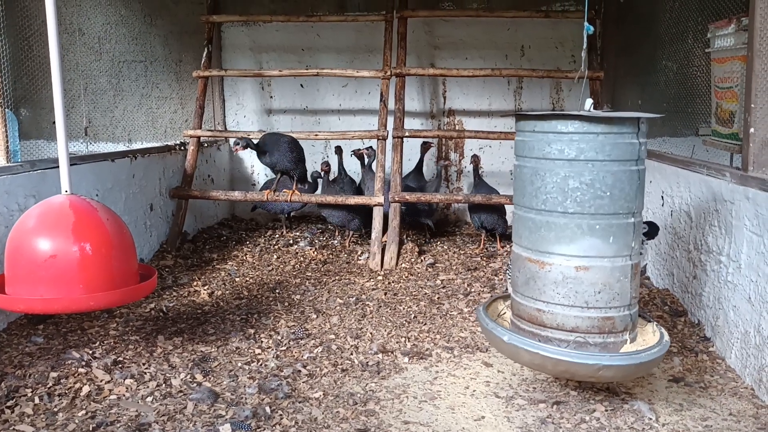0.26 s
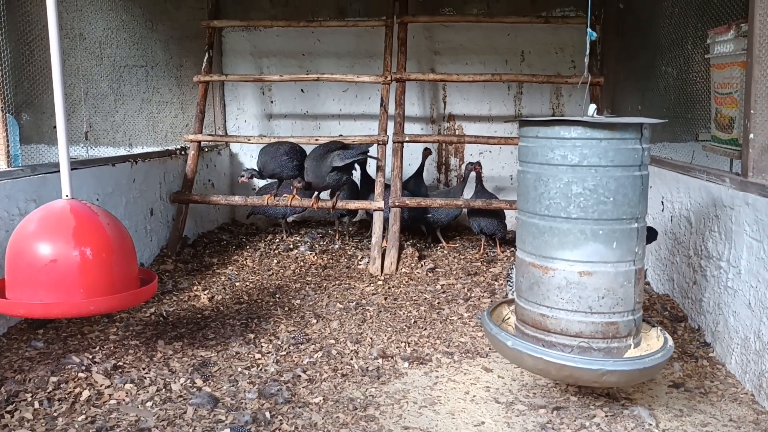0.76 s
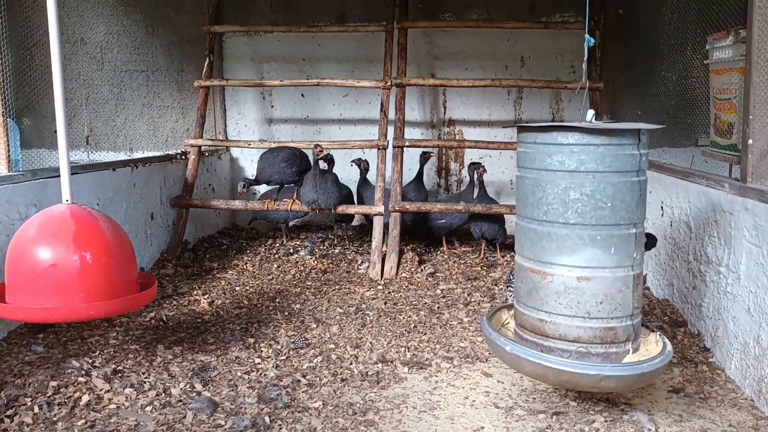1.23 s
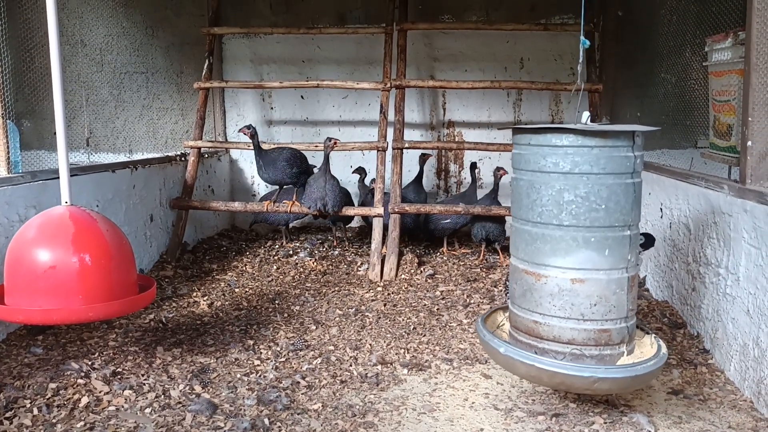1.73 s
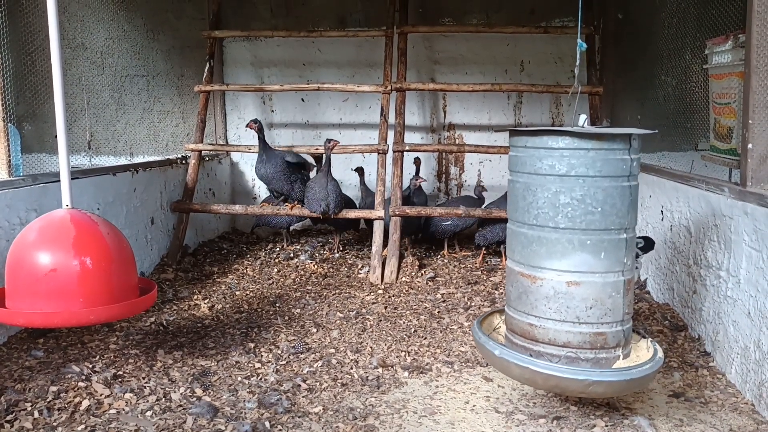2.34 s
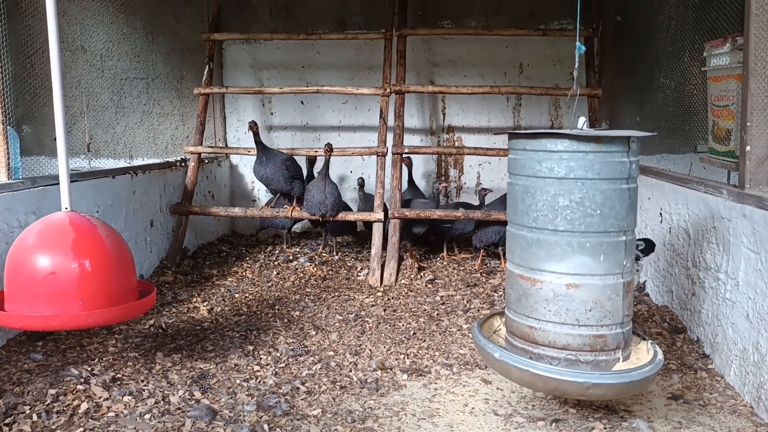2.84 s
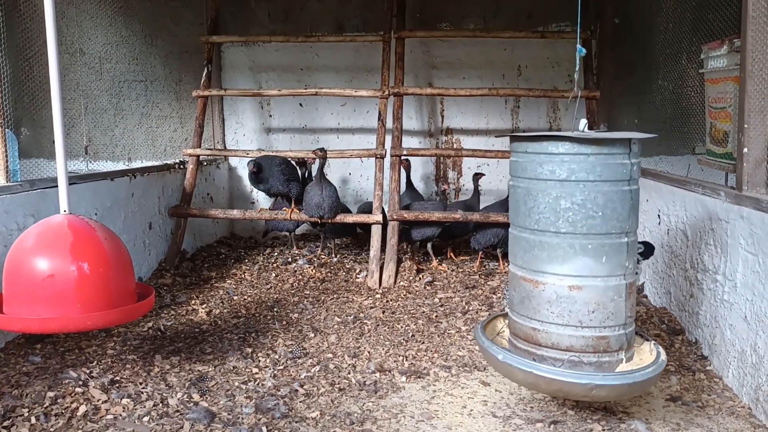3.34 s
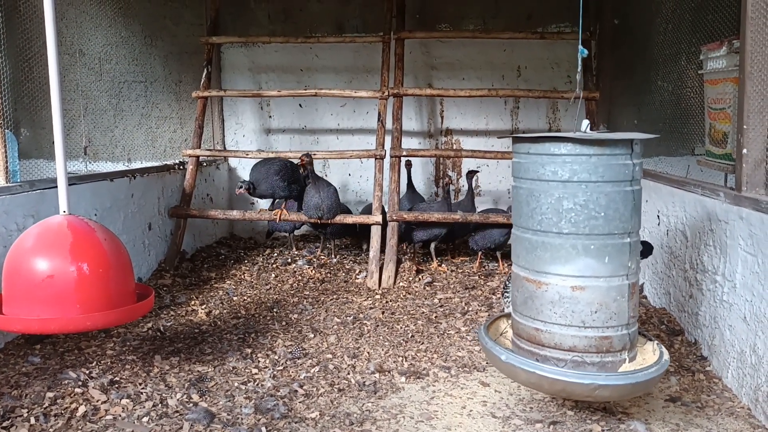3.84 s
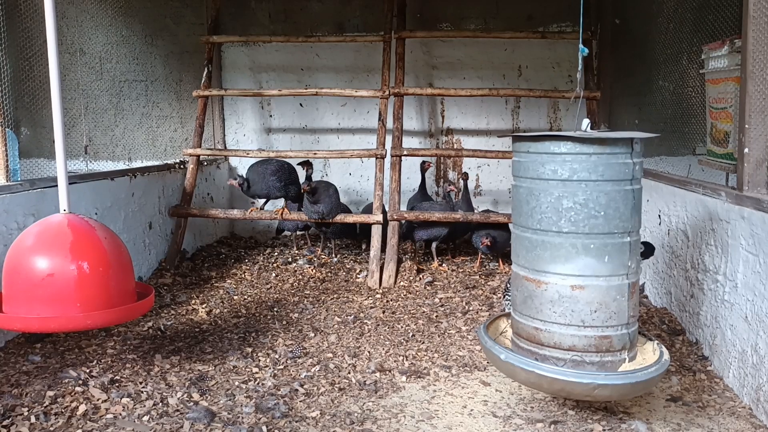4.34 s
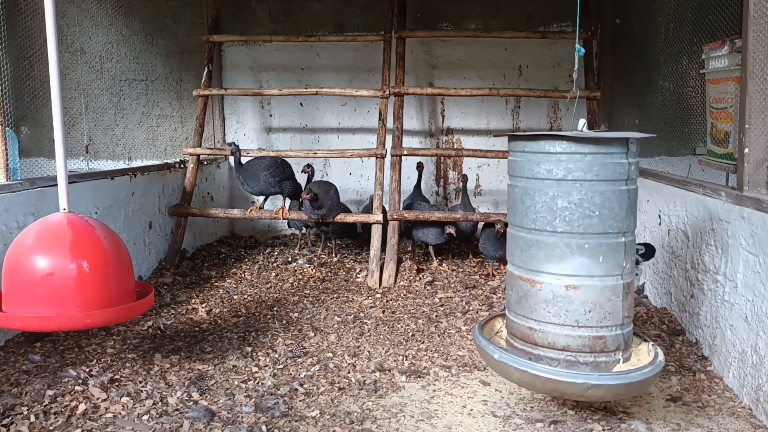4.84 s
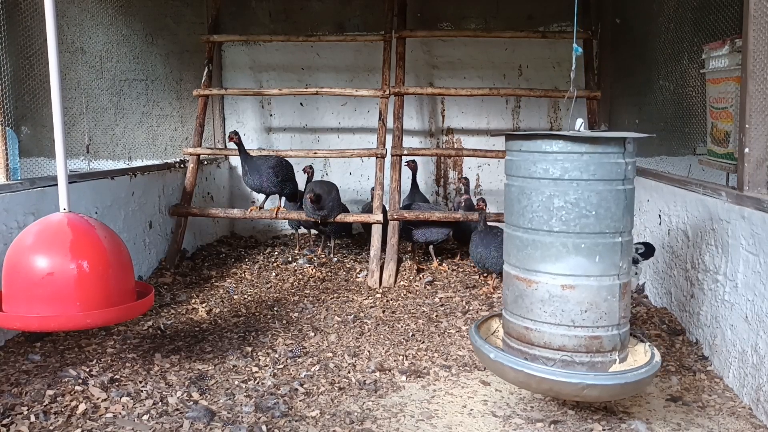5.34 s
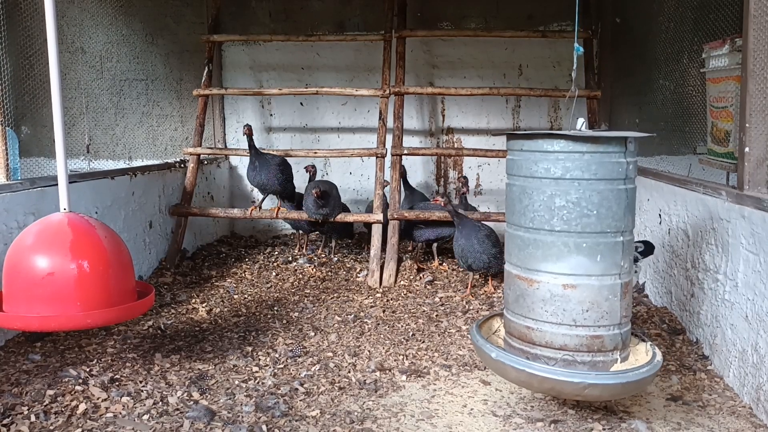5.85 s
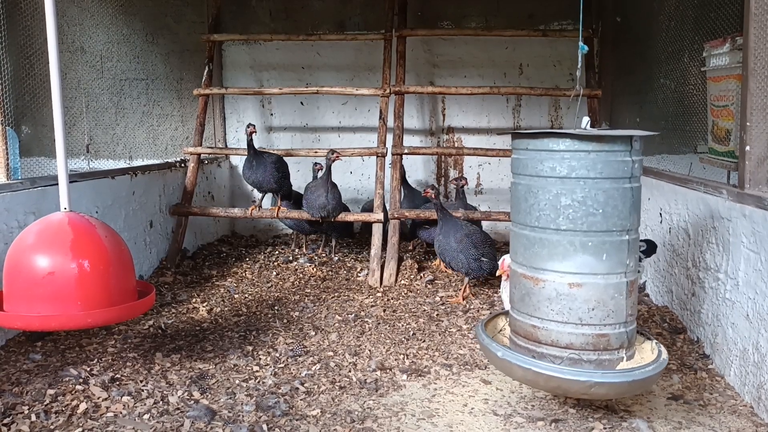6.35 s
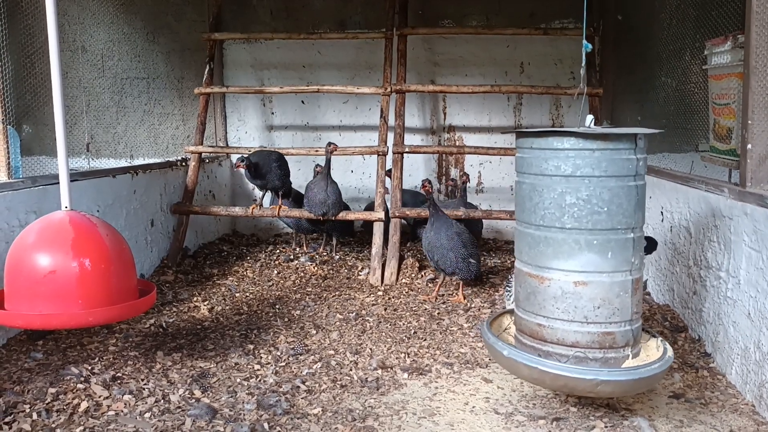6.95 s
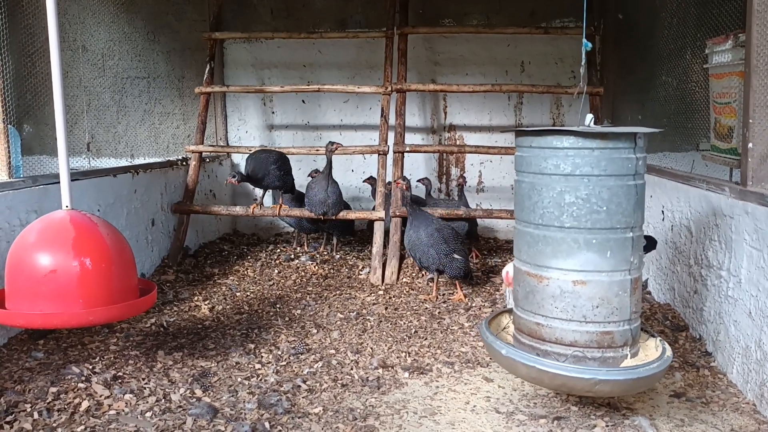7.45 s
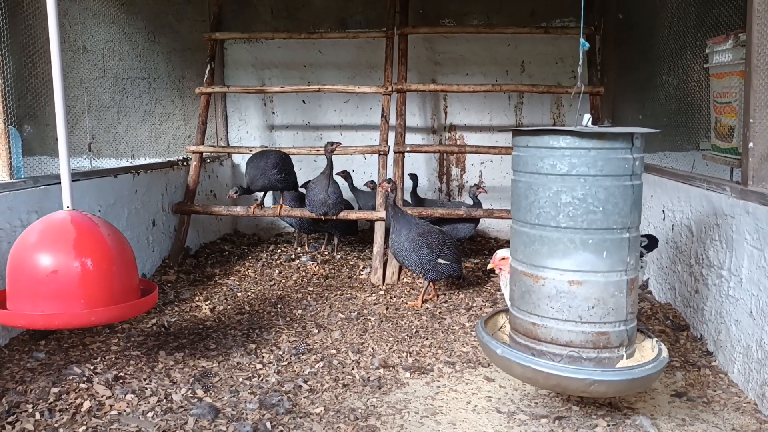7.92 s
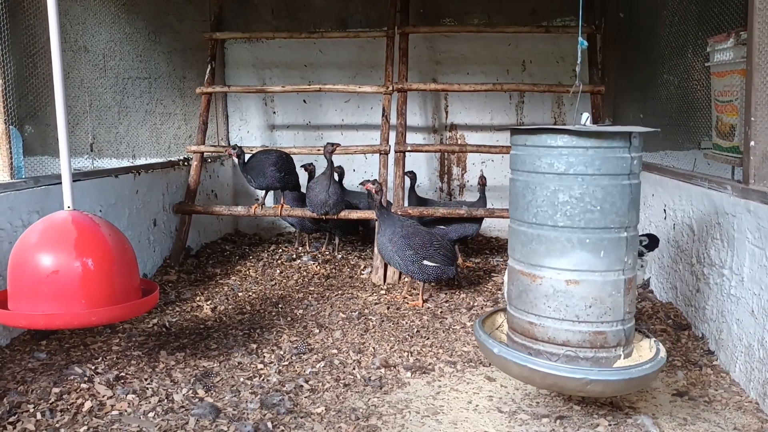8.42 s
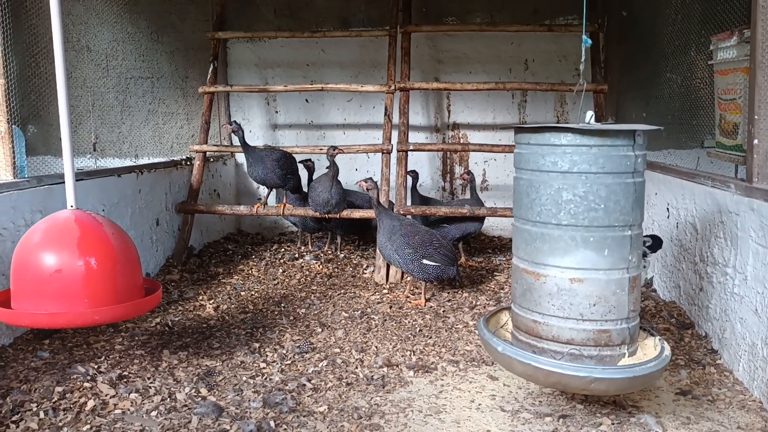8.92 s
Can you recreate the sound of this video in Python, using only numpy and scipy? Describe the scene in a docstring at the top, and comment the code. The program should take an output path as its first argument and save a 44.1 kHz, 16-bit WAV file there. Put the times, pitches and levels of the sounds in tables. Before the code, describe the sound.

A flock of guineafowl calls in harsh, fast, overlapping notes and squeals inside a walled pen, then calms to low clucks and thin peeps.

```python
"""A walled pen, a flock of guineafowl heard on two microphones, stronger on the left.
Harsh notes overlap, each a train of syrinx pulses through a throat resonance that falls as the beak
closes. Many open with, or break into, a clean squeal. At the end the flock calms to low clucks, thin
peeps from the back and one peck. The walls ring briefly; a faint hum wavers in soft background noise."""
import sys
import numpy as np
from scipy import signal
from scipy.fft import rfft, irfft, next_fast_len
from scipy.io import wavfile
from scipy.ndimage import uniform_filter1d, map_coordinates

SR = 44100
rng = np.random.default_rng(int(sys.argv[2]) if len(sys.argv) > 2 else 0)


def inscribe(sig):
    """Save sig as 16-bit PCM at rate SR to the path in sys.argv[1].

    A 1-D sig is mono; a 2-D sig holds one channel per row.
    Samples are clipped to [-1, 1] before scaling.
    """
    pcm = np.round(np.clip(np.atleast_2d(sig).T, -1, 1) * 32767)
    wavfile.write(sys.argv[1], SR, pcm.astype(np.int16))


N = 404838


def harsh_notes(bite_db=3, bite_s=.042, closing_db=14, chest_fade_db=4, rasp_rise_s=.0081):
    """Each note starts with a push of air; as the beak closes the throat falls and the rasp fades."""
    # start_s, length_s, pitch_hz, open_throat_hz, level_db
    notes = [(0, 0.075, 331, 1810, -21), (0.067, 0.059, 359, 2180, -20.5),
             (0.204, 0.16, 339.5, 1860, -18.5), (0.412, .14, 323.8, 2010, -20),
             (0.565, 0.058, 317, 2030, -26), (0.642, 0.081, 350, 2310, -27.5),
             (0.687, .11, 309.5, 2080, -25), (.88, 0.083, 324.6, 1970, -20),
             (1.072, 0.075, 328.5, 2300, -19), (1.198, .14, 353.6, 2360, -21.5),
             (1.391, 0.068, 318.3, 2270, -21.5), (1.574, 0.064, 327, 2380, -22),
             (1.701, 0.45, 316.9, 2024, -20), (2.043, 0.26, 320.4, 2100, -26), (2.173, 0.2, 310, 1690, -21),
             (2.292, 0.078, 316.4, 3050, -27.5), (2.402, 0.052, 316, 2250, -21),
             (2.577, 0.14, 332.4, 2360, -20.5), (2.771, .11, 334.8, 2400, -22),
             (2.888, 0.068, 328, 2610, -24.5), (3.006, .065, 355, 2420, -23),
             (3.078, 0.098, 312.2, 1620, -21.5), (3.173, 0.063, 317.4, 1760, -20.5),
             (3.257, 0.096, 330, 2160, -21.5), (3.365, 0.15, 317.7, 1700, -21.5),
             (3.563, .15, 345.3, 2150, -19.5), (3.846, 0.16, 344.2, 2150, -21),
             (4.178, .16, 350.8, 1930, -20.5), (4.413, 0.064, 362.5, 2200, -22.5),
             (4.559, .12, 350.2, 1920, -19.5), (4.711, 0.054, 363.6, 2270, -19),
             (4.864, .15, 333, 2000, -20), (5.105, 0.059, 330.3, 2350, -20.5),
             (5.264, .08, 324.1, 2170, -19.5), (5.373, 0.22, 337.3, 2380, -22),
             (5.514, 0.31, 312.5, 2210, -23.5), (5.731, 0.097, 317.7, 1810, -20),
             (5.838, 0.087, 311.4, 2000, -20.5), (6.089, .12, 356, 2510, -22),
             (6.306, .1, 341.5, 2580, -21.5), (6.409, 0.16, 321.3, 1350, -25.5),
             (6.511, 0.096, 344, 2230, -20), (6.648, 0.076, 351, 2980, -25),
             (6.752, 0.13, 339.4, 2150, -19.5), (6.962, 0.096, 329.6, 2430, -15.5),
             (7.185, .11, 316.9, 2080, -19.5), (7.352, 0.054, 326, 2070, -17.5),
             (7.575, 0.053, 332.2, 2460, -16.5), (7.8, 0.051, 322.7, 2110, -19.5),
             (8.109, 0.049, 311.4, 2520, -22)]
    usual_pitch_hz, usual_throat_hz, usual_length_s = 332, 2150, .1
    gape, gape_s = .16, .0084  # the beak flies open: the throat starts this share higher, then settles
    out = np.zeros((2, N))
    for start_s, length_s, pitch_hz, open_hz, level_db in notes:
        t, envelope = gate(length_s, attack_s=.00085, release_s=.0025)
        closing = np.minimum(t / length_s, 1)
        pulses, low_harmonics = voice(t, length_s, pitch_hz)
        strain_hz = pitch_hz - usual_pitch_hz
        closed_hz = 1504 + 1.8 * strain_hz
        centre_hz = open_hz * (closed_hz / open_hz) ** closing * (1 + gape * np.exp(-t / gape_s))
        open_cry = throat(pulses, centre_hz, width_hz=780, cut_hz=894)
        closed_cry = throat(pulses, centre_hz, width_hz=780, cut_hz=813)
        cry = unit((1 - closing) * open_cry + closing * closed_cry)
        # a wider beak and a higher, strained pitch give more rasp
        rasp_db = -.5 + 11 * np.log2(open_hz / usual_throat_hz) + .06 * strain_hz
        rasp_gain = amp(rasp_db - closing_db * closing ** 2) * np.minimum(t / rasp_rise_s, 1)
        edge = rasp_gain * rasp(pulses, start_s)
        # the lowest harmonics leak out through the neck, most in short, strained barks
        chest_db = -21.5 + 2.2 * np.log2(usual_length_s / length_s) + .06 * strain_hz
        chest = amp(chest_db + chest_fade_db * (.93 - closing)) * low_harmonics
        push = amp(level_db + bite_db * np.exp(-t / bite_s))
        add(out, start_s, pen(envelope * push * (cry + edge + chest)))
    return out


def voice(t, length_s, pitch_hz, sag=.25, settle_s=.035, opening_ratio=1.53, break_s=.016):
    """A high, clear opening breaks into a lower, sagging buzz: gives pulses and two low harmonics."""
    strain = np.exp(-t / settle_s)
    bend = 1 + sag * (strain - strain[t < length_s].mean()) + .01 * wobble(len(t), 70)
    cycles = np.cumsum(pitch_hz * bend) / SR
    opening_hz = opening_ratio * pitch_hz * (1 + .015 * rng.standard_normal())
    clear = syrinx(opening_hz * t, jitter=.015)
    buzz = syrinx(cycles, jitter=np.interp(length_s, [.06, .25], [.032, .024]))  # held notes settle
    broken = 1 / (1 + (break_s / (t + 1 / SR)) ** 6)
    pulses = np.sqrt(1 - broken) * clear + np.sqrt(broken) * buzz
    low_harmonics = np.sin(2 * np.pi * cycles) + amp(-12) * np.sin(4 * np.pi * cycles)
    return pulses, np.sqrt(broken) * low_harmonics * amp(3 * wobble(len(t), 90))


def syrinx(cycles, jitter, shimmer_db=2.2):
    """One slightly uneven pulse a cycle, with a little air chopped at the same rate."""
    size, count = len(cycles), int(cycles[-1]) + 1
    onsets = np.interp(np.arange(count) + jitter * rng.standard_normal(count), cycles, np.arange(size))
    pulses = np.bincount(onsets.astype(int), amp(shimmer_db * rng.standard_normal(count)), size)
    breath = rng.standard_normal(size) * (1 + np.cos(2 * np.pi * cycles))
    return unit(unit(pulses) + .2 * unit(breath))


def throat(x, centre_hz, width_hz, cut_hz):
    """A gliding resonance, applied twice; the short windpipe radiates little below cut_hz."""
    carrier = np.exp(2j * np.pi * np.cumsum(centre_hz) / SR)
    pole = np.exp(-np.pi * width_hz / SR)
    ring = (signal.lfilter([1], np.poly([pole, pole]), x / carrier) * carrier).real
    return unit(signal.sosfilt(signal.butter(6, cut_hz, "high", fs=SR, output="sos"), ring))


def rasp(pulses, start_s, smear_rad=2.04, ripple_db=2.5):
    """Each pulse rattles briefly in the windpipe, which spreads it in time and colours the note."""
    # spectrum of the rasp: frequency_hz, density_db
    spectrum = [(200, -51), (480, -28), (600, -7.5), (780, -38.5), (950, -4.5), (1400, 5), (2000, 3),
                (2800, 1.5), (4200, 0.5), (5000, -9.5), (5800, -16), (7000, -13), (9500, -13.5),
                (11500, -21.5), (15500, -27)]
    # lift of its top octave through the scene: time_s, gain_db
    top_octave = [(0, -2.5), (1.5, 4), (3.2, 0.5), (4.6, 3.5), (5.9, -4.5), (7.1, 4.5), (7.8, -3.5)]

    def windpipe(hz):
        phase, ripple = (map_coordinates(knots, [hz / 500]) for knots in rng.standard_normal((2, 50)))
        top_db = np.interp(start_s, *np.transpose(top_octave)) * np.clip((hz - 7000) / 6000, 0, 1)
        return amp(along(spectrum, hz) + top_db + ripple_db * ripple) * np.exp(1j * smear_rad * phase)
    return unit(filtered(pulses, windpipe))


def squeals(boost_db=2, first_db_per_s=190, fall=.054, dull_hz=3700):
    """The syrinx jumps to a high, clean mode, and the throat favours its second harmonic."""
    # start_s, length_s, pitch_hz, level_db
    notes = [(0.414, .021, 1310, -24), (0.886, 0.0068, 1230, -11), (1.048, 0.022, 1515, -21.5),
             (1.066, 0.053, 1079, -15), (1.193, .047, 1366, -25), (1.391, 0.019, 1526, -23.5),
             (1.579, 0.011, 1215, -16), (1.7, 0.061, 1353, -24), (2.032, .027, 1210, -16),
             (2.31, .028, 1196, -21), (3.188, 0.034, 964, -15), (3.562, 0.02, 1305, -18.5),
             (3.965, 0.078, 1079, -15), (4.19, 0.042, 958, -16), (4.414, 0.025, 1114, -21.5),
             (4.565, 0.025, 1076, -20), (4.865, 0.015, 1312, -17.5), (5.105, 0.018, 1318, -19.5),
             (5.459, 0.052, 1020, -24), (7.015, 0.044, 1112, -12), (7.191, .015, 1514, -22.5),
             (7.798, 0.016, 1510, -24.5)]
    out = np.zeros((2, N))
    for start_s, length_s, pitch_hz, level_db in notes:
        t, envelope = gate(length_s, attack_s=.003, release_s=.003)
        bend = 1 + fall * (.5 - t / length_s) + .022 * wobble(len(t), 290)
        phase = 2 * np.pi * np.cumsum(pitch_hz * bend) / SR
        first = amp(-17 + first_db_per_s * np.minimum(t, length_s))  # grows as the beak closes
        third = amp(-9) / (1 + (3 * pitch_hz / dull_hz) ** 6)
        tone = sum(gain * np.sin(k * phase) for k, gain in enumerate([first, 1, third, amp(-27)], 1))
        squeal = amp(boost_db + level_db) * np.sqrt(2) * envelope * tone
        add(out, start_s, pen(squeal, direct_db=-4, walls_db=-6.5, tail_db=-19))
    return out


def clucks(open_hz=1030, shut_hz=830, chest_db=-24, rasp_db=-5, closing_db=14):
    """Soft, low clucks and grunts that swell quickly and fade gently, with the beak nearly shut."""
    # start_s, length_s, pitch_hz, level_db
    notes = [(3.829, 0.025, 360.6, -28), (4.151, 0.029, 389, -37), (7.552, .023, 503, -28),
             (7.762, 0.02, 440, -30.5), (8.041, 0.094, 393, -33.5), (8.181, 0.053, 318, -26),
             (8.322, 0.067, 297, -26), (8.415, 0.083, 307, -22.5), (8.565, 0.064, 288.4, -25),
             (8.738, 0.058, 284.3, -25.5), (8.928, 0.06, 388, -28.5)]
    out = np.zeros((2, N))
    for start_s, length_s, pitch_hz, level_db in notes:
        t = np.arange(int(length_s * SR)) / SR
        closing = t / length_s
        pulses = syrinx(pitch_hz * t, jitter=.06)
        cry = throat(pulses, open_hz * (shut_hz / open_hz) ** closing, width_hz=850, cut_hz=784)
        chest = amp(chest_db) * np.sin(2 * np.pi * pitch_hz * t)
        edge = amp(rasp_db - closing_db * closing) * rasp(pulses, start_s)
        cluck = amp(level_db) * np.interp(closing, [0, .19, 1], [0, 1, 0]) * (cry + chest + edge)
        add(out, start_s, pen(cluck, direct_db=-8.5, walls_db=2.5, tail_db=-3.5))
    return out


def peeps(waver=.051):
    """Thin peeps and whines from the back of the flock: wavering, gliding tones."""
    # start_s, length_s, start_hz, end_hz, level_db
    glides = [(7.235, 0.18, 772, 816, -34), (7.997, .065, 2750, 2930, -45), (8.665, 0.11, 888, 858, -42),
              (8.964, .09, 3440, 2360, -49), (9.135, 0.047, 2940, 3010, -45)]
    out = np.zeros((2, N))
    for start_s, length_s, start_hz, end_hz, level_db in glides:
        t, envelope = gate(length_s, attack_s=.005, release_s=.0062)
        hz = np.interp(t, [0, length_s], [start_hz, end_hz]) * (1 + waver * wobble(len(t), 611))
        peep = amp(level_db) * envelope * unit(np.sin(2 * np.pi * np.cumsum(hz) / SR))
        add(out, start_s, pen(peep, direct_db=-5, walls_db=-8, tail_db=-6))
    return out


def peck(start_s=9.075, level_db=-32):
    """One small, dry tap: a click of noise through a broad resonance."""
    out = np.zeros((2, N))
    t, envelope = gate(.00055, attack_s=.00058, release_s=.0013)
    click = throat(rng.standard_normal(len(t)), np.full(len(t), 900), width_hz=670, cut_hz=530)
    add(out, start_s, amp(level_db) * envelope * click)
    return out


def pen(x, direct_db=-6, walls_db=-5, tail_db=-4, left_lag_s=.0007, walls_s=.022, echoes=10):
    """One bird's paths to the two microphones: direct, off the near walls, then a diffuse tail."""
    # ring of the pen: frequency_hz, t60_s
    ring_times = [(150, 0.36), (400, 0.97), (1000, 0.38), (2500, 0.36), (6000, 0.3), (14000, 0.16)]
    size = SR // 2
    hz, t, noise = signal.stft(rng.standard_normal((2, size)), SR, nperseg=256)
    decaying = noise * amp(-60 * t / along(ring_times, hz)[:, None]) * (1 - np.exp(-t / .0029))
    tail = signal.istft(decaying, SR, nperseg=256)[1][:, :size]
    paths = amp(tail_db) * tail / np.linalg.norm(tail[0])
    paths[[0, 1], [int(left_lag_s * SR), 0]] += amp(direct_db)
    delays_s = rng.uniform(.002, walls_s, echoes) + rng.uniform(0, .001, (2, echoes))
    echo_gains = amp(walls_db) * unit(rng.standard_normal(echoes)) / np.sqrt(echoes)
    paths[[[0], [1]], (delays_s * SR).astype(int)] += echo_gains
    return signal.fftconvolve(x[None], paths, axes=1)


def hum(pitch_hz=82.5, level_db=-67.5, ramp_s=.07):
    """A faint, low tone that wavers and swells now and then."""
    # start_s, length_s, rise_db
    swells = [(3.75, 1.52, 10), (6.03, .3, 8), (7.902, 1.16, 4.5)]
    t = np.arange(N) / SR
    for start_s, length_s, rise_db in swells:
        end_s = start_s + length_s
        level_db += rise_db * np.interp(t, [start_s - ramp_s, start_s, end_s, end_s + ramp_s], [0, 1, 1, 0])
    gain = amp(level_db + 2.6 * wobble(N, 5))
    hz = pitch_hz + 1.8 * wobble(N, 3.8)
    return gain * unit(np.sin(2 * np.pi * np.cumsum(hz) / SR))


def background_noise(level_db=-49):
    """Soft, drifting noise, with a lift near 300 Hz for the lingering ring of the birds' low notes."""
    # spectrum of the noise: frequency_hz, density_db
    spectrum = [(25, -27), (60, -6), (130, -5), (300, 6.5), (600, -8.5), (1500, -5), (4000, -17.5),
                (15000, -31.5)]
    noise = rng.standard_normal(N) + .5 * rng.standard_normal((2, N))
    return amp(level_db + wobble(N, 2.91)) * unit(filtered(noise, lambda hz: amp(along(spectrum, hz))))


def amp(db):
    """Decibels to gain."""
    return 10 ** (np.asarray(db) / 20)


def unit(x):
    """Scale to rms 1."""
    return x / np.sqrt(np.mean(x ** 2) + 1e-20)


def along(points, hz):
    """Read (frequency_hz, value) points on a log axis."""
    knots_hz, values = np.transpose(points)
    return np.interp(np.log(hz + 1), np.log(knots_hz + 1), values)


def wobble(size, rate_hz):
    """A smooth random curve with rate_hz knots a second."""
    knots = rng.standard_normal(int(size * rate_hz / SR + 4))
    return map_coordinates(knots, [np.arange(size) * rate_hz / SR])


def filtered(x, response):
    """Multiply the spectrum of x by response(hz)."""
    size = x.shape[-1]
    padded = next_fast_len(size + SR // 20)
    return irfft(rfft(x, padded) * response(np.fft.rfftfreq(padded, 1 / SR)), padded)[..., :size]


def add(track, start_s, x):
    """Mix x into the track from start_s."""
    start = max(round(start_s * SR), 0)
    x = x[..., :max(N - start, 0)]
    track[..., start:start + x.shape[-1]] += x


def gate(length_s, attack_s, release_s):
    """Time axis and envelope of one note."""
    t = np.arange(int((length_s + .04) * SR)) / SR
    return t, np.minimum(t / attack_s, 1) * np.exp(-np.maximum(t - length_s, 0) / release_s)


def scene():
    """The flock and the background, stronger in the left microphone."""
    # stereo balance: frequency_hz, left_minus_right_db
    balance = [(250, 10), (1000, 9), (2000, 7.5), (4000, 4), (8000, 3.5), (12000, 6.5)]

    def lean_left(hz):
        gains = amp(np.outer([.5, -.5], along(balance, hz)))
        return np.sqrt(2) * gains / np.linalg.norm(gains, axis=0)
    mix = harsh_notes() + squeals() + clucks() + peeps() + peck() + hum() + background_noise()
    return filtered(mix, lean_left)


def record(dry, drive_db=3.5, ceiling_db=-13, window_s=.054, top_hz=15800):
    """Fast gain control levels the loudest notes, peaks are rounded, nothing passes above top_hz."""
    driven = dry * amp(drive_db)
    power = np.abs(uniform_filter1d(np.mean(driven ** 2, axis=0), int(window_s * SR)))
    levelled = driven * (1 + (power / amp(ceiling_db) ** 2) ** 2) ** -.25
    rounded = levelled / (1 + (levelled / .85) ** 8) ** (1 / 8)
    return filtered(rounded, lambda hz: hz < top_hz)


dry = scene()
out = record(dry)
inscribe(out)
```